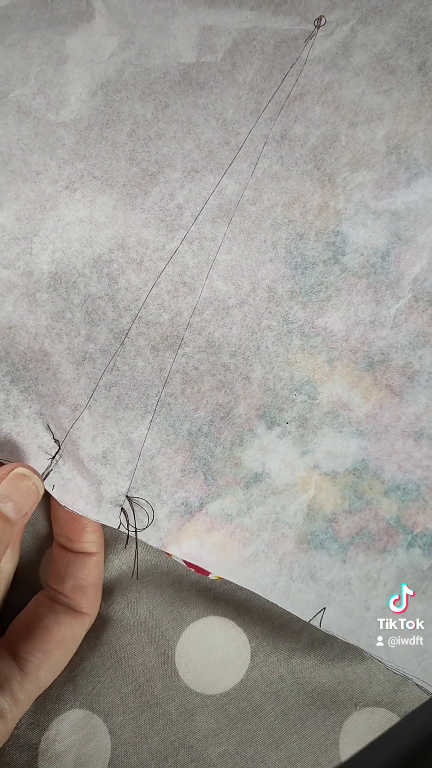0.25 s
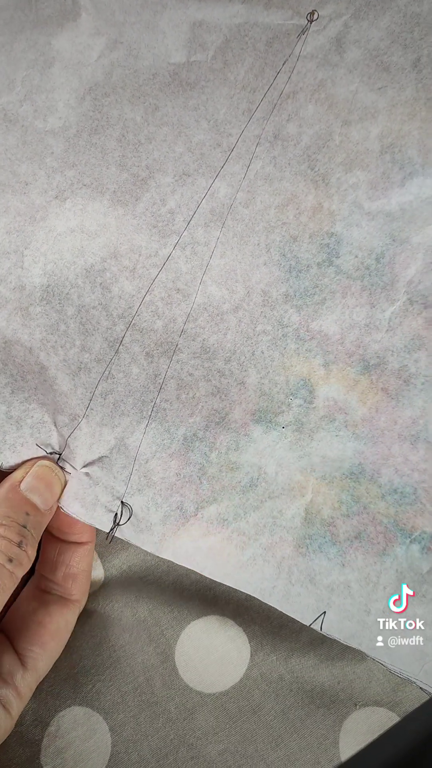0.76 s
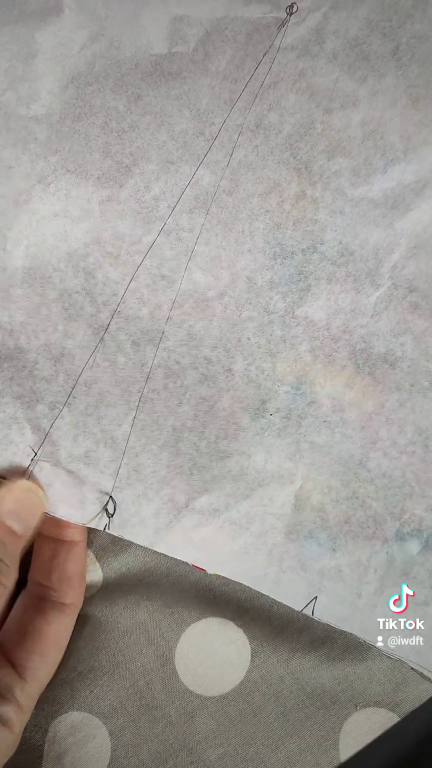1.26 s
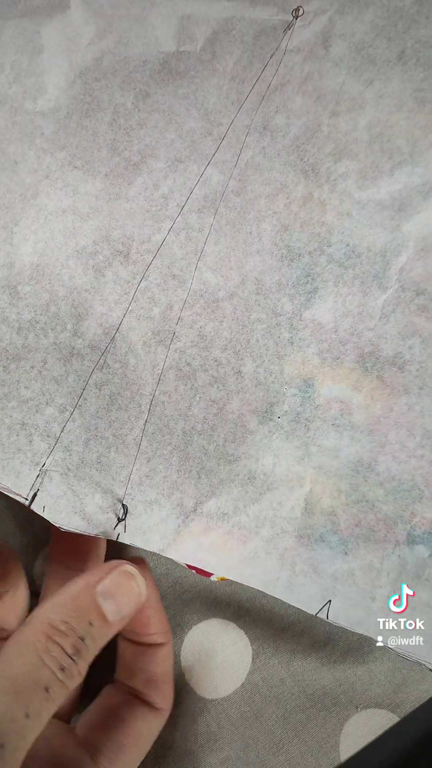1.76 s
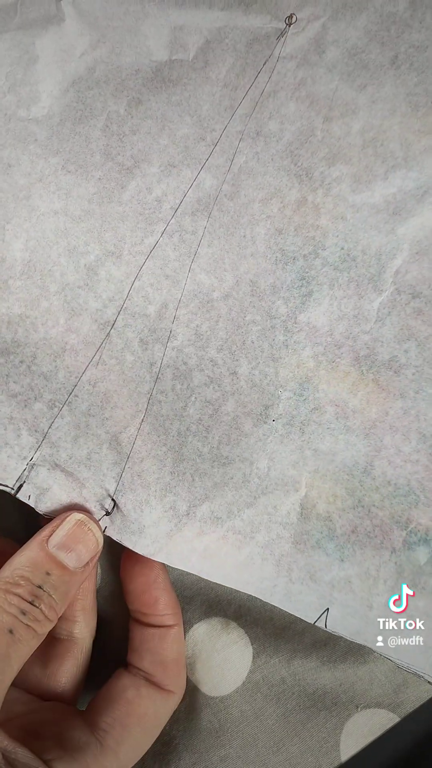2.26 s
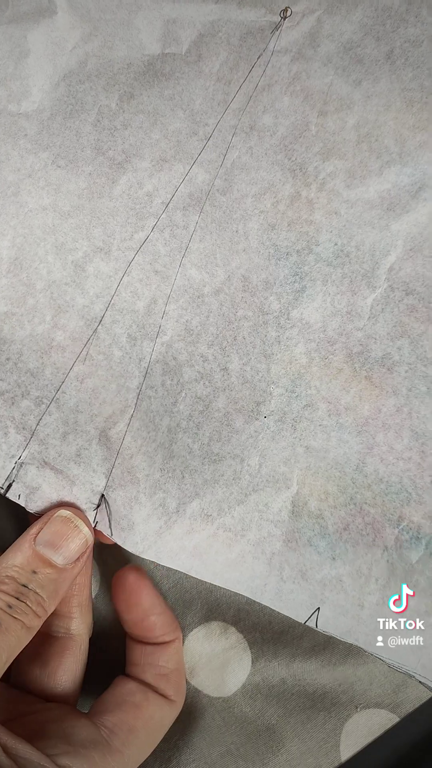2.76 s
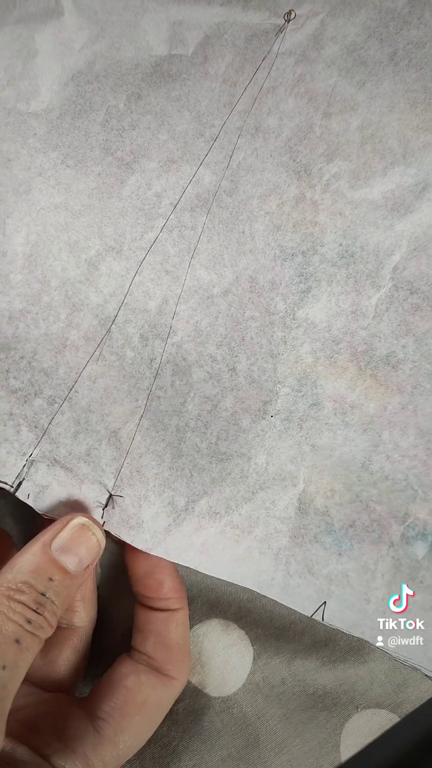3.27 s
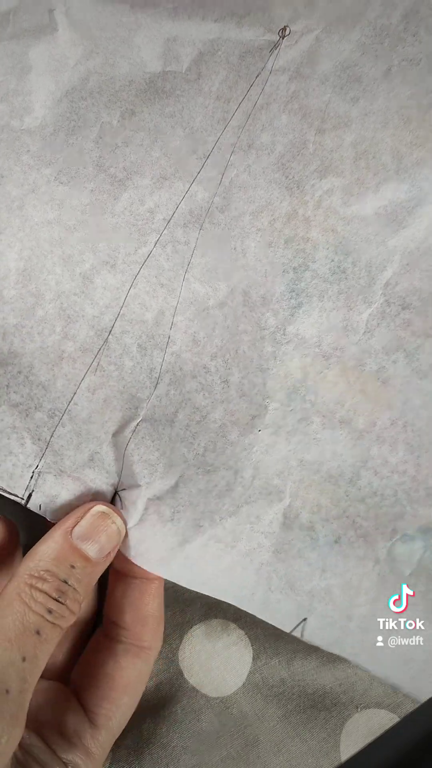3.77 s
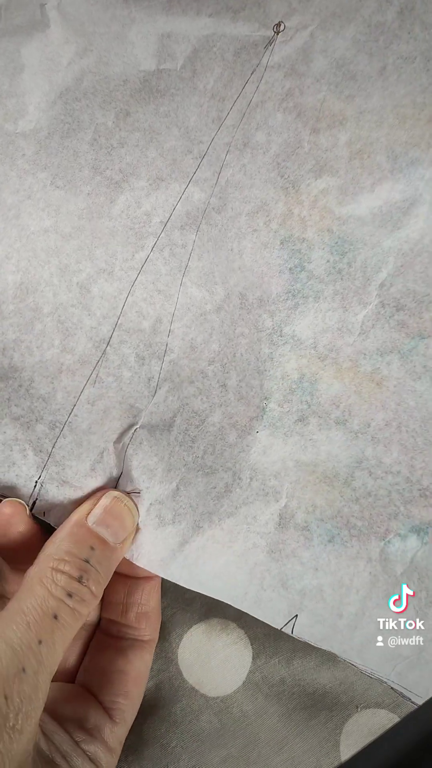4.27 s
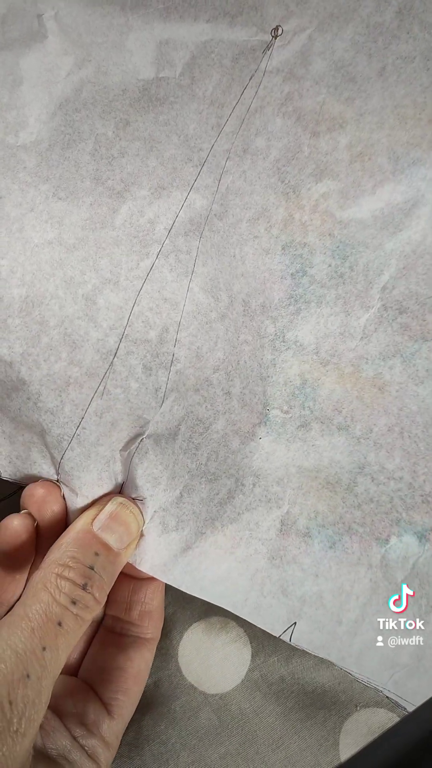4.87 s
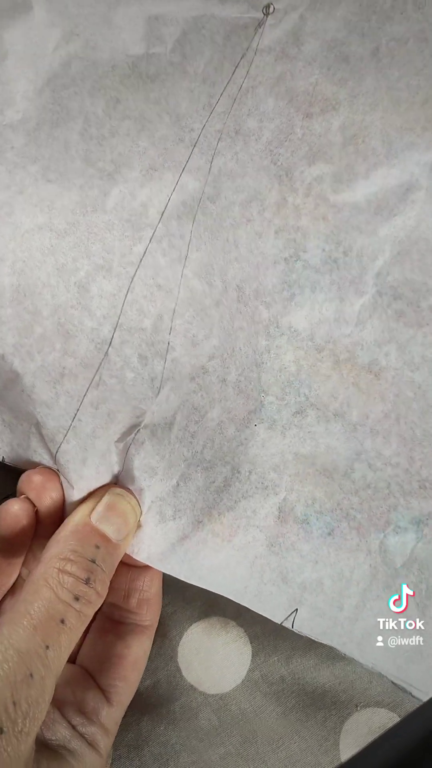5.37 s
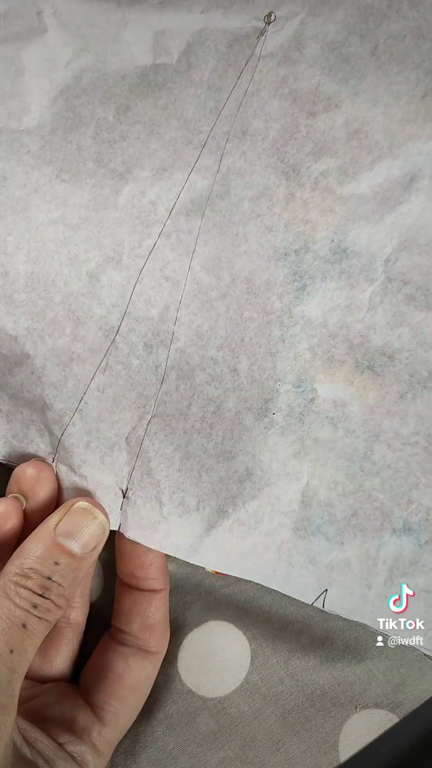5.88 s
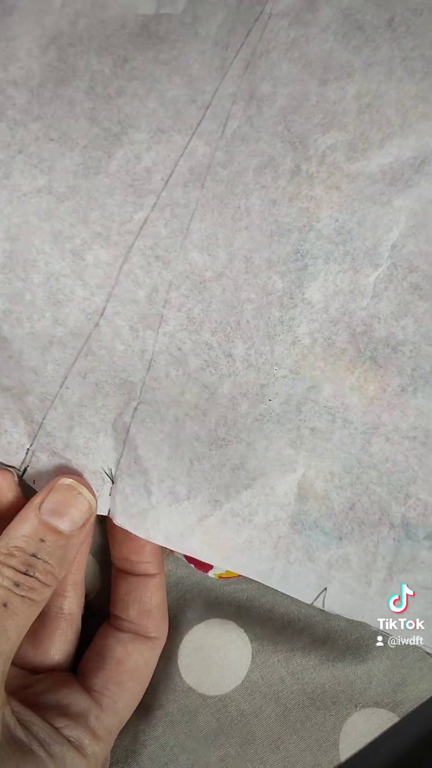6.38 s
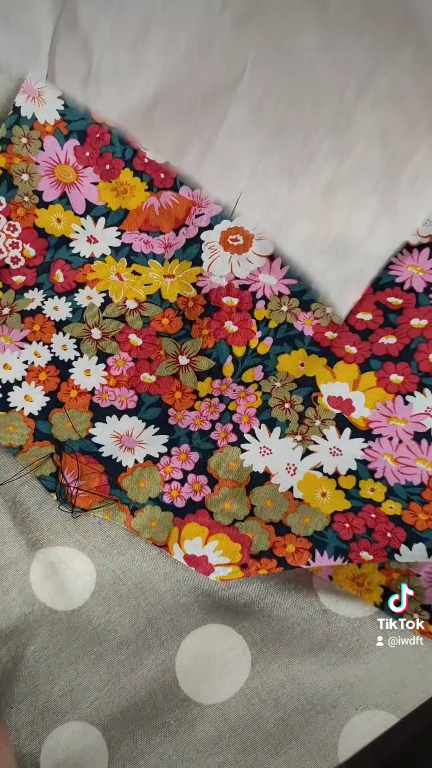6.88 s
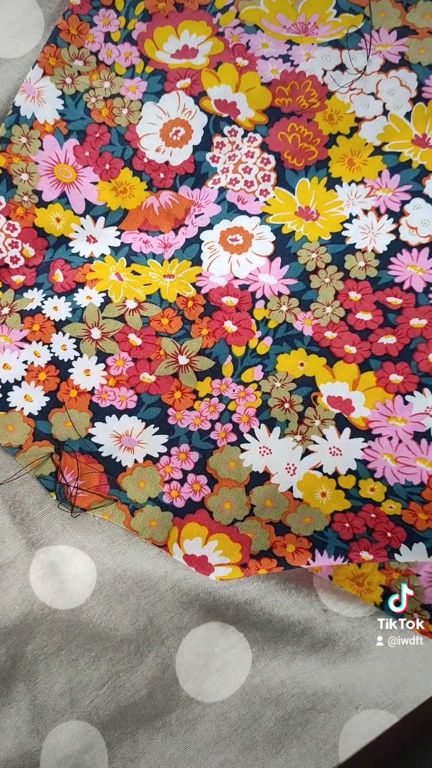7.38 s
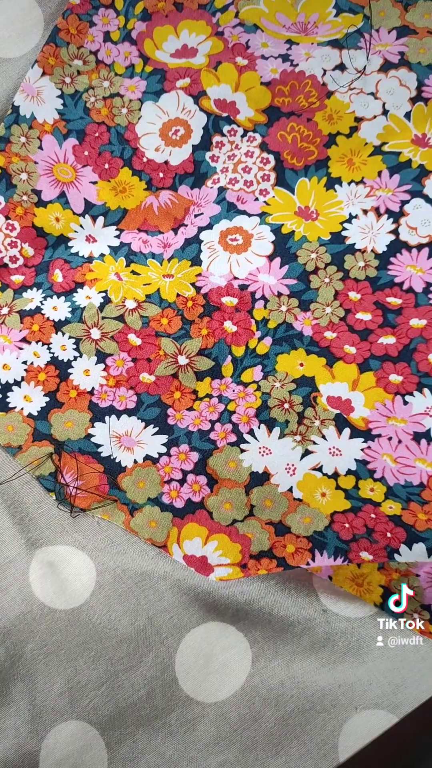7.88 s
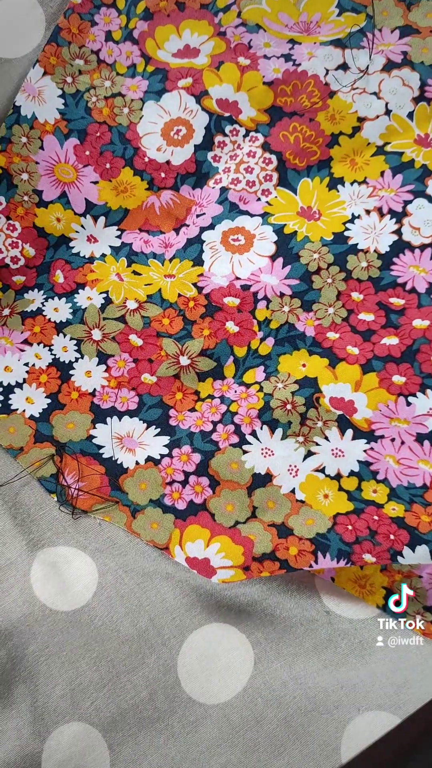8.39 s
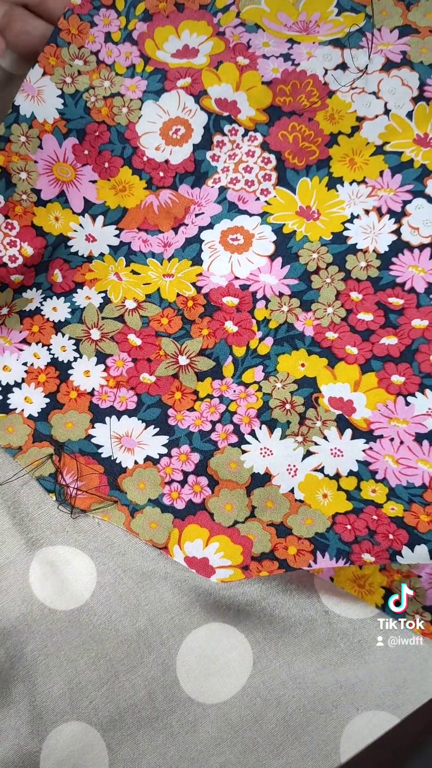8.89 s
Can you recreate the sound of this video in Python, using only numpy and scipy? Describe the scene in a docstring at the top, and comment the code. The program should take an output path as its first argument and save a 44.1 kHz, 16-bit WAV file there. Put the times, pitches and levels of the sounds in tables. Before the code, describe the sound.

Close, crisp crackles of thin paper being tugged from stitched threads, in irregular short bursts with quiet gaps. The snaps grow denser, then the whole sheet is lifted with a swishing rustle and laid down left of centre with a louder crinkle and a tiny puff of air. It settles, a soft low rub follows, then a light knock on the table. Small dry room, faint hiss, close stereo microphone.

```python
"""Fingers pick thin tracing paper off the tacking threads in a fabric: creases snap, short tugs crackle.
Then the sheet is lifted away to the left, laid down with a loud rustle and a puff of air, and settles.
Last, a soft rub glides in pitch and the table takes a light knock. Faint air noise and room echo run throughout.
Paper is shaped noise in decaying pulses, the rub a swept tone, the knock a sum of damped modes."""
import sys
import numpy as np
from scipy import signal
from scipy.fft import rfft, irfft, next_fast_len
from scipy.io import wavfile
from scipy.ndimage import uniform_filter1d, map_coordinates

SR = 44100
rng = np.random.default_rng(int(sys.argv[2]) if len(sys.argv) > 2 else 0)


def generate_wav(signal):
    """Clip the signal to [-1, 1] and save it as 16-bit WAV at the path in sys.argv[1]."""
    frames = np.transpose(np.atleast_2d(signal))
    scaled = np.clip(frames, -1, 1) * 32767
    pcm = np.round(scaled).astype(np.int16)
    wavfile.write(sys.argv[1], SR, pcm)


N = 402633
TIME = np.arange(N) / SR

# spectrum of still room air and hiss: [f/Hz, density level/dB]
AIR_SPECTRUM = [(15, -39), (25, -3.5), (92, -4), (127, -1), (344, -0.5), (394, -4), (439, -1.5),
                (531, -5.5), (575, -1.5), (624, -4.5), (1370, -7.5), (2220, -7.5), (7920, -10.5),
                (14800, -16.5), (16000, -4.5)]
# share of the room air's power that both ears have in common: [f/Hz, share]
AIR_LIKENESS = [(50, 0.04), (180, 0.26), (550, 0.26), (1650, 0.014), (5000, 0.067)]
# decay time of the room: [f/Hz, t60/s]
ROOM_DECAY = [(150, 0.41), (1000, 0.11), (5000, 0.17), (9000, 0.089), (15000, 0.17)]
# damped modes of the table: [f/Hz, level/dB, t60/s]
TABLE_MODES = [(218, 0, 0.15), (265, 0, 0.093), (376, -4.5, 0.16), (556, -11, 0.044), (696, -7, 0.041),
               (1664, -6.5, 0.051), (2400, -8, .025)]
# light knocks on the table: [t/s, level/dB]
KNOCK_TIMES = [(9.105, -46.5)]
# soft rub, whose pitch follows its speed: [t/s, f/Hz, level/dB]
RUB_PATH = [(8.57, 300.6, -95), (8.62, 323.3, -61.5), (8.65, 320, -62.5), (8.685, 161.4, -63.5),
            (8.725, 265, -60.5), (8.755, 306.1, -58), (8.78, 243.4, -62), (8.81, 164.7, -73.5),
            (8.9, 127.9, -79), (8.935, 182.8, -62.5), (8.96, 222, -56.5), (8.99, 172.7, -67.5),
            (9.015, 125, -66.5), (9.05, 108, -87.5)]
# where the sheet is: [t/s, left-right level/dB, lead of the left ear/s]
SHEET_PLACE = [(0, 0.5, 0.000057), (5.9, 0.5, 0.000057), (6.4, 4.5, 0.00011), (6.85, 2.5, 0.00045),
               (7.6, 2, 0.00044), (7.85, 1.5, .00043), (8.1, 3.5, 0.00037), (8.6, -0.5, 0.00021)]
# spectrum of the whole sheet: [f/Hz, density level/dB]
SHEET_SPECTRUM = [(59, -40), (100, -24.5), (255, -13), (442, -18), (736, -12.5), (1230, -9), (2320, -8),
                  (3540, -2.5), (5080, 1.5), (5770, 1), (6840, -4.5), (9820, -19), (12700, -17.5),
                  (14700, -11.5), (16000, -18.5)]
# spectrum of one crease: [f/Hz, density level/dB]
CREASE_SPECTRUM = [(100, -39), (230, -16), (600, -6), (950, -14.5), (1450, 0.5), (2100, -10), (3400, -4),
                   (4700, -1.5), (5600, -1.5), (6300, -6.5), (7200, -6.5), (8500, -17), (10500, -17),
                   (15000, -21)]
# the fingers tug, each time with a short burst of crackle: [t/s, length/s, level/dB]
TUG_BURSTS = [(0.023, 0.1, -67), (0.14, 0.15, -62.5), (0.411, 0.094, -62), (0.57, 0.216, -63),
              (0.974, 0.01, -48), (1.056, 0.04, -56), (1.197, 0.061, -57.5), (1.288, 0.14, -60.0),
              (1.47, 0.1, -68), (1.635, 0.095, -66.5), (1.792, 0.019, -59.5), (1.885, 0.097, -56),
              (2.013, 0.11, -54.0), (2.47, 0.1, -64), (2.635, 0.092, -66), (3.276, 0.136, -67),
              (3.414, 0.039, -45.5), (3.5, 0.07, -56.5), (3.786, 0.11, -50.0), (4.086, 0.2, -64),
              (4.467, 0.025, -54.0), (4.61, 0.092, -61), (5.362, 0.093, -63.5), (5.678, 0.082, -54),
              (5.843, 0.02, -56), (5.885, 0.19, -67.5), (6.096, 0.11, -47.5), (6.179, 0.12, -46.5),
              (6.351, 0.074, -49.0), (6.488, 0.024, -57.5)]
# rustle of the whole sheet as it is lifted away: [t/s, level/dB, air against it/dB]
LIFT_RUSTLE = [(6.571, -68.5, -15), (6.592, -35, -11), (6.652, -53.5, -10), (6.745, -44.5, -6.5),
               (6.836, -51.5, -6), (6.884, -45, -9.5), (7.04, -55.5, -8), (7.154, -43.5, -15),
               (7.233, -42.5, -8), (7.259, -58.1, -27), (7.274, -43.5, -18), (7.41, -65, -14)]
# the same as it is laid down: [t/s, level/dB, air against it/dB]
LAY_RUSTLE = [(7.41, -62.5, -8), (7.564, -52.5, -19), (7.57, -59.5, -35), (7.67, -38.5, -4),
              (7.713, -48.5, -24), (7.752, -31, -0.5), (7.798, -34.0, -2), (7.849, -46, -17),
              (7.86, -36.5, -2.5), (7.887, -41.5, -10.5), (8.0, -42.5, -6), (8.051, -32.5, -7.5),
              (8.18, -60.5, -13)]
# the same as it is left to settle: [t/s, level/dB, air against it/dB]
SETTLE_RUSTLE = [(8.18, -62, -20), (8.223, -58.2, -16), (8.286, -44.5, -9), (8.344, -54.5, -3.5),
                 (8.388, -47.5, -8), (8.435, -54, -10.5), (8.485, -70.5, -20), (8.571, -48, -14),
                 (8.639, -67, -1)]
# clearest creases that buckle and fibres that give way at the thread; thud, flex and air are against level:
# [t/s, level/dB, thud/dB, flex/dB, air/dB, left-right level/dB, facet resonance f/Hz]
CLEAR_SNAPS = [(0.037, -50, -25, -15, -8.5, 0, 5170), (0.1599, -50.5, -4.5, 0, -12, -1, 4100.0),
               (0.2127, -43.5, -13, -18, -15, 2, 4600), (0.29, -44.5, -19, -15, -11, -1, 5500.0),
               (0.4135, -45.5, -15.5, -9, -4.5, 1, 5000), (0.4866, -40, -24, -15.5, -11, -2, 5530),
               (0.5812, -38.5, -25, -28, -23, -4, 5070), (0.619, -41, -31, -16, -7.5, 0, 4000.0),
               (0.7816, -45, -34, -12, -17, 0, 4500), (0.8834, -33.0, -26, -12, -13, 0, 4790),
               (0.9863, -26.5, -15, -11.5, -9.5, -0.5, 5270), (1.0805, -37.0, -26, -25, -5.5, 4, 6950),
               (1.3024, -48, -31, -30, -15, -1, 4900.0), (1.3364, -44.5, -31, -20, -21, -4, 4370),
               (1.805, -41.0, -19, -19, -6.5, 1, 6400.0), (1.8952, -36.5, -32, -15, -4.5, 0.5, 5510),
               (1.9655, -41.5, -40, -10.5, -17, 3, 5100), (2.0255, -36.5, -28, -14, -4.5, 5, 5800.0),
               (2.0592, -39, -24, -24, -16, 3, 3940), (2.1, -38.5, -16.5, -13, -11, 2, 5040),
               (2.117, -38.5, -23, -12, -20, 0, 4860), (2.2412, -48.5, -27, -16, -30, 1, 4970),
               (2.3563, -57, -14, -4, -14, 0, 3890), (2.4883, -44.5, -33, -5, -6, 3, 4900),
               (2.6483, -54, -17, -3, -16, 0, 3160), (2.6851, -44, -25, -4.5, -7.5, 1, 5800.0),
               (2.9854, -57, -27, -9, -26, -2, 3610), (3.4218, -39, -17, -10, -3.5, 0, 5620),
               (3.4288, -45, -17, -9, -12, -3, 5600.0), (3.442, -36, -34, -14, -23, -5, 4650),
               (3.4701, -37, -23, -19, -18, -1, 4750), (3.5443, -39.5, -31, -9.5, -15, 1, 4380),
               (3.571, -43, -39, -18, -11, 0, 4580), (3.671, -52, -27, -10, -11, 1, 5650),
               (3.752, -43.5, -41, -21, -4.5, -1, 5290), (3.8114, -35.5, -33, -14, -12, 2, 3850),
               (3.8212, -31, -25, -15, -11.5, 0, 4350), (3.8567, -40, -37, -7, -31, 0, 4220),
               (3.8722, -37.0, -40, -17, -33, -6, 3100.0), (3.8976, -39, -39, -21, -16, 0, 4500.0),
               (3.9127, -33, -39, -17, -8.5, 1, 6540), (3.9351, -41.5, -29, -19, -14, 0, 5230),
               (4.1197, -45.5, -28, -11, -10, 2, 5200.0), (4.163, -43.5, -29, -9, -7, 2, 5450),
               (4.2053, -52, -20, 0.5, -17, -1, 4700.0), (4.2325, -37.5, -39, -9, -19, -3, 4540),
               (4.2663, -54.5, 3.5, 13.5, -26, 0, 3900.0), (4.4735, -45, -20, -21, -14, -3, 4540),
               (4.485, -30.5, -38, -17.5, -11, 3, 5200.0), (4.6619, -41.5, -16.5, -10.5, -5.5, 0, 4300),
               (4.785, -46, -17, -13, -15, -4, 3710), (4.873, -55.5, -9, -10, 3.5, -1, 5060),
               (5.2415, -35.5, -40, 1, -9.5, -1.5, 3535), (5.4011, -54, -9, 10, -11, -4, 3510),
               (5.582, -53, -14, -20, -15, 1, 5160), (5.6842, -47.5, -2.5, -3, -18, -1, 4650),
               (5.696, -43, -30, -11, -20, -2, 3720), (5.7303, -41, -38, -20, -19, 0, 5530),
               (5.74, -42.5, -36, -24, -18, -5, 4310), (5.8236, -44, -19, -25, -8, 4, 6000.0),
               (5.8561, -37.5, -30, -21, -5, -3, 5690), (5.967, -52.5, -29, -3, -8, -1, 4054),
               (6.0648, -45, -28, -12, -14, 1, 5430), (6.109, -35.5, -21, -13, -17, -1, 4630),
               (6.1246, -31.5, -18, -19, -8.5, 0, 4900.0), (6.2004, -33.5, -30, -12, -10, -6, 5750),
               (6.252, -34, -27, -11, -22, -10, 4950), (6.3157, -46, -21, -18, -8, -5, 5434),
               (6.3784, -47, -10, -20, -6, 9, 6030), (6.4943, -41.5, -24, -8, -8.5, 2, 5076),
               (6.5857, -44, -14, -8, -4, 2, 5380), (6.5967, -37.5, -20, -7, -5, 11, 5000.0),
               (6.661, -40.5, -16, -5.5, -7.5, 7, 6514), (6.694, -46, -33, -12, 3, 1, 5310),
               (6.721, -37, -31, -4, -1, 3, 6935), (6.86, -36.5, -22, -17, -10, 10, 5530),
               (6.893, -42, -13, -7.5, -13, -1, 5140), (7.0753, -42, -33, -24, -11, -2, 5034),
               (7.118, -39, -33, -24, -1, 7, 5740), (7.145, -38, -19, -23, -3, 12, 5950),
               (7.167, -32, -21, -16, -5.5, 3, 5100.0), (7.2192, -30.5, -16, -10, -1.5, 8, 6080),
               (7.2853, -42.5, -32, -23, -6, 11, 6585), (7.309, -40, -34, -7, -17, 3, 4020),
               (7.4673, -42.5, -42, -11, -10, 14, 4960), (7.5304, -39.5, -23, -8, -2.5, 3.5, 5880),
               (7.5906, -39.5, -43, -14, -9, 5, 6050), (7.653, -32, -24, -10, -6, 3, 5963),
               (7.7322, -33.5, -16, -13, -1, 6, 5550), (7.7546, -25.5, -29, -27, 0, -1, 5328),
               (7.8144, -28.5, -26, -20, -7.5, -5, 5804), (7.8573, -43, -24, -4, -3, -1, 5026),
               (7.919, -33.5, -19, -13, -11, 6, 6644), (7.9404, -31.5, -17.5, -11, -10, 4, 5560),
               (7.9849, -34.0, -14, -5.5, -9, 6, 5700.0), (8.088, -34, -36, -27, -18, 11, 5007),
               (8.1137, -43, -27, -12, -3, 1, 5366), (8.2535, -42.5, -37, -19, -1.5, 0, 5406),
               (8.3709, -39, -36, -9, -2, 1.5, 7040), (8.4209, -43.5, -28, -20, -4, 0, 5770)]

# registers of the paper (low Hz, high Hz)
THUD, FLEX, CRACKLE, AIR = (140, 800), (800, 2500), (2500, 8000), (8000, 16000)
TOP_HZ = 15750  # upper band limit
# a tug: rise time (s), gain in level over its length (dB), fall after it (dB/s), air in it (dB)
ATTACK_S, RISE_DB, RELEASE_DB_PER_S, TUG_AIR_DB = .015, .5, 380, -8.5
HOLD_DB = -71  # faint rustle of the sheet throughout
BRISK_DB = -44.5  # reference level of a brisk rustle
FLEX_DB, FLEX_FALL = -11.5, 0.094  # flex register when brisk (dB); dB less of it for each dB louder
BUCKLE_FROM_DB, BUCKLE_FULL_DB = -67.5, -53  # below the first the paper only slides; from the second it buckles freely
FACET_DB, FACET_WIDTH = 6, .13  # a facet's resonance: height (dB), half width as a share of its pitch
# small stray creases in a brisk rustle: rate (1/s), level (dB), scatter (dB)
STRAY_RATE, STRAY_DB, STRAY_SPREAD_DB = 24, -45.5, 2.5
STRAY_CROWDING, STRAY_GROWTH = .5, 0.83  # dB of their rate and of their size for each dB of rustle
AIR_DB_PER_OCTAVE, FACET_HZ = 19.5, 5000  # more air the higher a stray's facet rings; median facet pitch


def amp(db):
    """Level as a logarithmic ratio: decibels to amplitude gain."""
    return 10 ** (np.asarray(db) / 20)


def unit(x):
    """Normalisation of mean power: x at rms 1."""
    return x / np.sqrt(np.mean(x ** 2) + 1e-20)


def along(points, hz):
    """Logarithmic frequency scale: (Hz, value) points interpolated on it."""
    f, v = np.transpose(points)
    return np.interp(np.log(hz + 1), np.log(f + 1), v)


def curves(rows, at=TIME):
    """Linear interpolation in time: each column after the first, at the given moments."""
    s, *cols = np.transpose(rows)
    return [np.interp(at, s, c) for c in cols]


def wobble(rate):
    """Slow random modulation: a smooth curve through `rate` random knots a second."""
    coarse = TIME[::32]
    knots = rng.standard_normal(int(N * rate / SR) + 4)
    return np.interp(TIME, coarse, map_coordinates(knots, [coarse * rate]))


def filtered(x, response):
    """Linear filtering: the spectrum of x times a response of frequency."""
    size = x.shape[-1]
    padded = next_fast_len(size + size // 8)
    spectrum = rfft(x, padded) * response(np.fft.rfftfreq(padded, 1 / SR))
    return irfft(spectrum, padded)[..., :size]


def band(x, edges):
    """Causal band-pass filtering: one register of x, without pre-ringing."""
    return signal.sosfilt(signal.butter(4, edges, 'bandpass', fs=SR, output='sos'), x)


def blend(shared, own, share):
    """Interaural coherence: a shared signal and separate ones mixed by their share of power."""
    share = np.clip(share, 0, 1)
    return np.sqrt(share) * shared + np.sqrt(1 - share) * own


def quiet(db):
    """Diffuse background noise: room air and a faint hiss, with a coherence that depends on frequency."""
    noise = rng.standard_normal((3, N))

    def alike(hz):
        return np.clip(along(AIR_LIKENESS, hz), 0, 1)

    shared = filtered(noise[0], lambda hz: amp(along(AIR_SPECTRUM, hz)) * np.sqrt(alike(hz)))
    own = filtered(noise[1:], lambda hz: amp(along(AIR_SPECTRUM, hz)) * np.sqrt(1 - alike(hz)))
    return amp(db + 0.23 * wobble(2.3)) * unit(shared + own)


def room(x, build_up):
    """Reverberation: decaying noise, different in each ear and drawn anew every quarter second."""
    out, hop = np.zeros((2, N + SR)), SR // 4
    for start in range(0, N, hop):
        hz, t, z = signal.stft(rng.standard_normal((2, SR // 3)), SR, nperseg=256)
        decay = amp(-60 * t / along(ROOM_DECAY, hz)[:, None])
        tail = signal.istft(z * decay, SR, nperseg=256)[1]
        tail *= 1 - np.exp(-TIME[:tail.shape[1]] / build_up)
        wet = signal.fftconvolve(x[:, start:start + hop], tail / np.linalg.norm(tail[0]), axes=1)
        out[:, start:start + wet.shape[1]] += wet
    return out[:, :N]


def knocks(thump_db, thump_t60):
    """Modal excitation: a soft blow rings the table's damped modes, with a dull noise thump."""
    out = np.zeros(N)
    for s, db in KNOCK_TIMES:
        t = TIME[:N - round(s * SR)]
        modes = sum(amp(level - 60 * t / t60) * np.sin(2 * np.pi * hz * t) for hz, level, t60 in TABLE_MODES)
        dull = unit(band(rng.standard_normal(len(t)), (200, 950)))
        thump = amp(thump_db - 60 * t / thump_t60) * dull
        out[N - len(t):] += amp(db) * (modes + thump)
    return band(out, (140, 5000))


def rub(overtone_db, rough, scuff_db):
    """Stick-slip friction: a hum at the speed of the stroke, with a dull scuff round it."""
    hz, level = curves(RUB_PATH)
    phase = 2 * np.pi * np.cumsum(hz * (1 + rough * wobble(150))) / SR
    tone = unit(np.sin(phase) + amp(overtone_db) * np.sin(2 * phase))
    scuff = unit(band(rng.standard_normal(N), (140, 460)))
    return amp(level) * (tone + amp(scuff_db) * scuff)


def flap(start, length, db):
    """Displacement of air: the landing sheet pushes out a soft puff of low noise."""
    u = np.maximum(TIME - start, 0) / length
    return amp(db) * u * np.exp(1 - u) * unit(band(rng.standard_normal(N), (80, 200)))


def ticks(level, rate, db, growth, spread_db, t60):
    """Random impulses with exponential decay: single fibres tick faintly throughout."""
    scatter = spread_db * np.clip(rng.standard_normal(N), -2, 2)
    sizes = amp(db + growth * (np.minimum(level, -55) - HOLD_DB) + scatter)
    blows = (rng.random(N) < rate / SR) * sizes
    fade = signal.fftconvolve(blows, amp(-60 * TIME[:SR // 20] / t60))[:N]
    # half the crease's spectrum in dB
    noise = unit(filtered(rng.standard_normal((3, N)), lambda hz: amp(along(CREASE_SPECTRUM, hz) / 2)))
    return band(blend(noise[0], noise[1:], 0.39) * fade, (400, 7500))


def handling():
    """Addition of powers: rustle level and its air (dB), first from single tugs, then from the whole sheet."""
    tugs = np.full(N, amp(HOLD_DB) ** 2)
    t = TIME[:SR // 2]
    for start, length, db in TUG_BURSTS:
        shape_db = RISE_DB * np.minimum(t / length, 1) - RELEASE_DB_PER_S * np.maximum(t - length, 0)
        tugs[round(start * SR):][:len(t)] += (np.minimum(t / ATTACK_S, 1) * amp(db + shape_db)) ** 2
    moves = np.vstack([LIFT_RUSTLE, LAY_RUSTLE, SETTLE_RUSTLE])
    sheet_db, air_db = curves(moves)
    moving = (TIME > moves[0, 0]) & (TIME < moves[-1, 0])
    level = 10 * np.log10(tugs + moving * amp(sheet_db) ** 2 + 1e-11)
    return level, np.where(moving, air_db, TUG_AIR_DB)


def patchy(depth_db):
    """Spectral modulation: three noises share a colour that shifts, as different folds of the sheet sound."""
    z = signal.stft(rng.standard_normal((3, N)), nperseg=256)[2]
    field = uniform_filter1d(rng.standard_normal(z.shape[1:]), size=6, axis=0)  # over frequency
    field = uniform_filter1d(field, size=5, axis=1)  # over time
    return signal.istft(z * amp(depth_db * unit(field)), nperseg=256)[1][:, :N]


def rustle(level, air, rate, spread_db, grain_t60, slide_db, thud_db, crackle_db, air_db):
    """Shot noise over friction: swarms of tiny buckles, denser when louder, over the hiss of paper on cloth."""
    flex = FLEX_DB - FLEX_FALL * (level - BRISK_DB)
    pan, lead = curves(SHEET_PLACE)
    density = rate * amp(.4 * (level - BRISK_DB))
    sizes = amp(spread_db * np.minimum(rng.standard_normal(N), 2))
    grains = (rng.random(N) < density / SR) * sizes ** 2
    # grains are powers, so they fall by twice the amplitude's exponent
    power = np.abs(signal.fftconvolve(grains, amp(-120 * TIME[:SR // 20] / grain_t60))[:N])
    # the pull sets how much energy is let go; the grains share it out
    power = power / (np.abs(uniform_filter1d(power, size=1500)) + 0.0013)
    buckling = np.clip((level - BUCKLE_FROM_DB) / (BUCKLE_FULL_DB - BUCKLE_FROM_DB), 0, 1)
    power = buckling * power + 1 - buckling
    noise = unit(filtered(patchy(depth_db=3.0), lambda hz: amp(along(SHEET_SPECTRUM, hz))))
    noise = noise * np.sqrt(power + amp(slide_db) ** 2)
    # the right ear hears the shared part a little later
    late = np.maximum(np.arange(N) - np.round(lead * SR).astype(int), 0)
    shared = np.array([noise[0], noise[0, late]])
    registers = [(THUD, flex + thud_db, .88), (FLEX, flex, .75), (CRACKLE, crackle_db, .4), (AIR, air + air_db, .35)]
    out = 0
    for edges, db, share in registers:
        part = unit(band(blend(shared, noise[1:], share), edges))
        out = out + part * amp(level + db + 2.2 * wobble(45))
    return out * amp([pan / 2, -pan / 2])


def strays(level, thud_db, flex_db, air_db, pan_db, facet_spread):
    """Point process of varying rate: rows of small creases, more and louder the harder the rustle."""
    draws = np.clip(rng.standard_normal((400, 5)), -2, 2)
    # a crease falls due each time the summed rate passes another whole number, give or take
    due = np.cumsum(STRAY_RATE * amp(STRAY_CROWDING * (level - BRISK_DB))) / SR
    turns = np.arange(len(draws)) + rng.random(len(draws))
    s = np.interp(turns[turns < due[-1]], due, TIME)
    size, thud, flex, pan, facet = draws[:len(s)].T
    db = STRAY_DB + STRAY_GROWTH * (np.interp(s, TIME, level) - BRISK_DB) + STRAY_SPREAD_DB * size
    octaves = facet_spread * facet
    air = air_db + AIR_DB_PER_OCTAVE * octaves
    side = curves(SHEET_PLACE, s)[0] + pan_db * pan
    rows = np.column_stack([s, db, thud_db + 4 * thud, flex_db + 4 * flex, air, side, FACET_HZ * 2 ** octaves])
    return rows[s > .01]


def snaps(rows, swell, ring_t60, echo_delay, echo_db, echo_t60, thud_db, flex_db, crackle_db, air_db):
    """Buckling instability: a crease gives way and rings its facet for milliseconds; near surfaces echo it."""
    s, level, thud, flex, air, pan, facet_hz = np.transpose(rows)
    size, span, ahead = 1024, 176, .002  # samples of a snap, samples its level is set over, lead-in (s)
    t, hz = np.arange(size) / SR - ahead, np.fft.rfftfreq(size, 1 / SR)
    facet = FACET_DB / (1 + ((hz / facet_hz[:, None, None] - 1) / FACET_WIDTH) ** 2)
    noise = rfft(rng.standard_normal((len(s), 3, size)))
    ring = irfft(noise * amp(along(CREASE_SPECTRUM, hz) + facet))

    def strike(u, t60):
        return np.exp(np.minimum(u, 0) / swell) * amp(-60 * np.maximum(u, 0) / t60)

    ring = ring * (strike(t, ring_t60) + amp(echo_db) * strike(t - echo_delay, echo_t60))
    # the right ear hears the shared part a little later
    lead = curves(SHEET_PLACE, s)[1]
    delay = np.exp(-2j * np.pi * hz * np.outer(lead, [0, 1])[..., None])
    shared = irfft(rfft(ring[:, :1]) * delay)
    sides = amp(np.outer(pan, [.5, -.5]))
    sides /= np.sqrt(np.mean(sides ** 2, axis=1, keepdims=True))
    registers = [(THUD, thud + thud_db, .92), (FLEX, flex + flex_db, .8),
                 (CRACKLE, crackle_db, .45), (AIR, air + air_db, .35)]
    sound = 0
    for edges, db, share in registers:
        part = band(blend(shared, ring[:, 1:], share), edges)
        part /= np.sqrt(np.sum(part ** 2, axis=-1, keepdims=True) / span)
        sound = sound + part * (amp(level + db)[:, None] * sides)[..., None]
    out = np.zeros((2, N + size))
    for start, snap in zip(s - ahead, sound):
        out[:, round(start * SR):][:, :size] += snap
    return out[:, :N]


def scene():
    """Superposition: room air, the table, the nearby paper, and the room's answer to table and paper."""
    level, air = handling()
    air_floor = quiet(db=-64.5)
    table = knocks(thump_db=-9.5, thump_t60=0.09) + rub(overtone_db=-20, rough=.04, scuff_db=-7.5)
    puff = flap(start=7.735, length=0.033, db=-57.5)
    fibres = ticks(level, rate=12, db=-69, growth=0.48, spread_db=13, t60=0.0091)
    sheet = rustle(level, air, rate=700, spread_db=6, grain_t60=.009, slide_db=-4,
                   thud_db=-7.5, crackle_db=-1.5, air_db=0)
    small = strays(level, thud_db=-17, flex_db=-11, air_db=-3.5, pan_db=8.5, facet_spread=0.34)
    cracks = snaps(np.vstack([CLEAR_SNAPS, small]), swell=0.00048, ring_t60=.0095,
                   echo_delay=0.0057, echo_db=-26.0, echo_t60=0.024,
                   thud_db=-0.5, flex_db=-2, crackle_db=-2, air_db=0.5)
    near = cracks + sheet + fibres + table + puff
    return near + amp(-11.5) * room(near, build_up=0.00043) + air_floor


def record(dry):
    """Band limitation: the deep bass is cut and almost nothing passes above the upper limit."""
    lean = signal.sosfilt(signal.butter(2, 45, 'highpass', fs=SR, output='sos'), dry)
    return filtered(lean, lambda hz: 1 / (1 + (hz / TOP_HZ) ** 120))


dry = scene()
out = record(dry)
generate_wav(out)
```